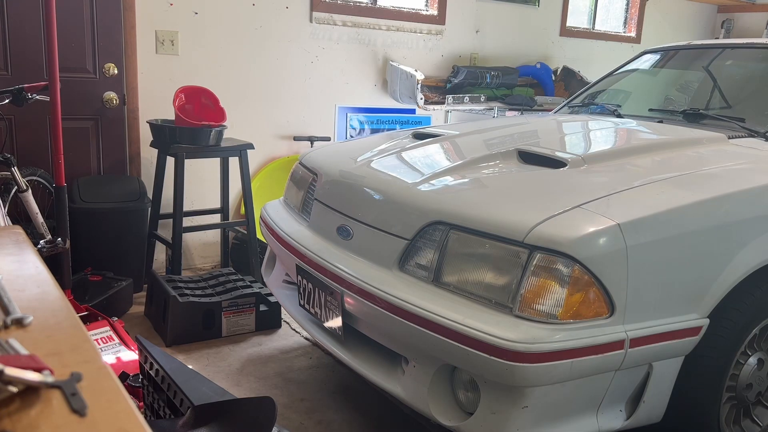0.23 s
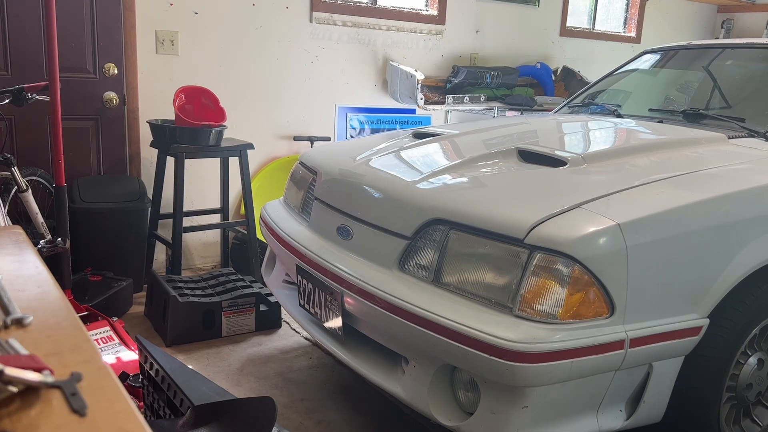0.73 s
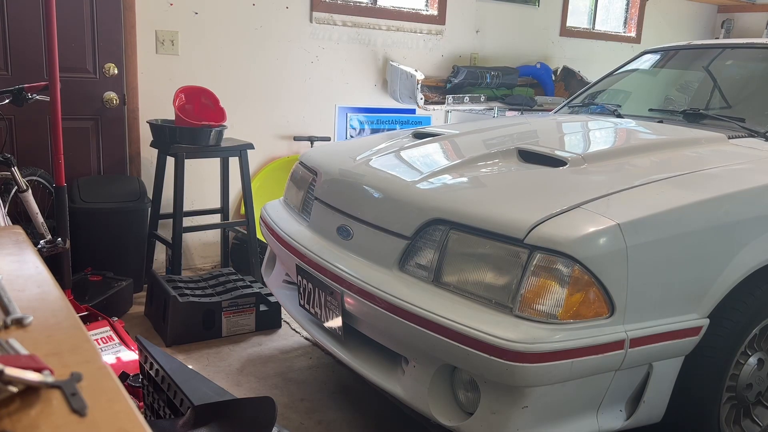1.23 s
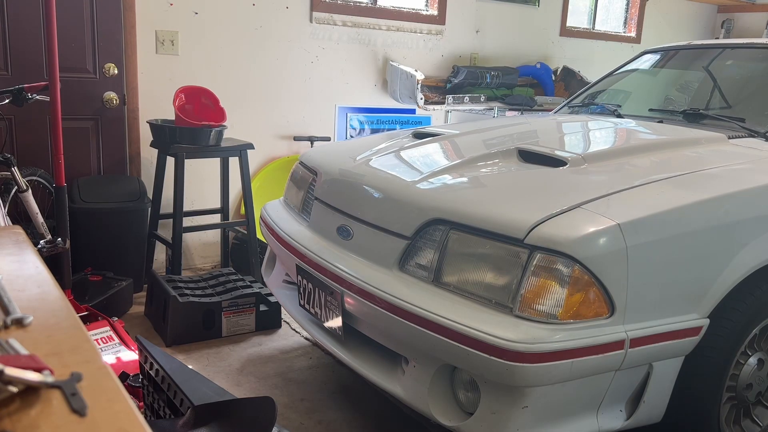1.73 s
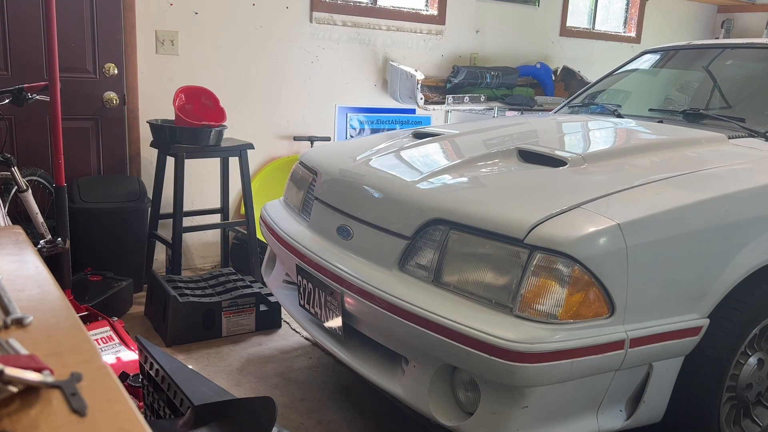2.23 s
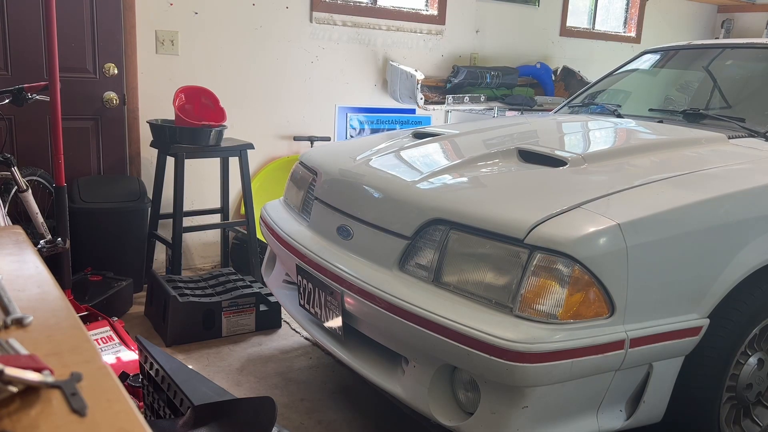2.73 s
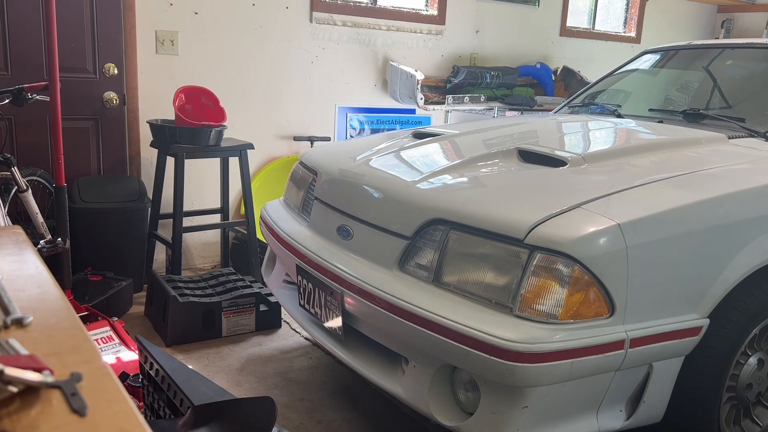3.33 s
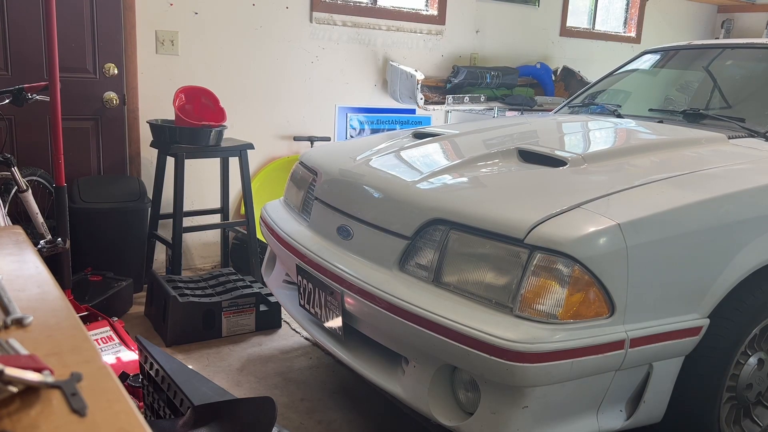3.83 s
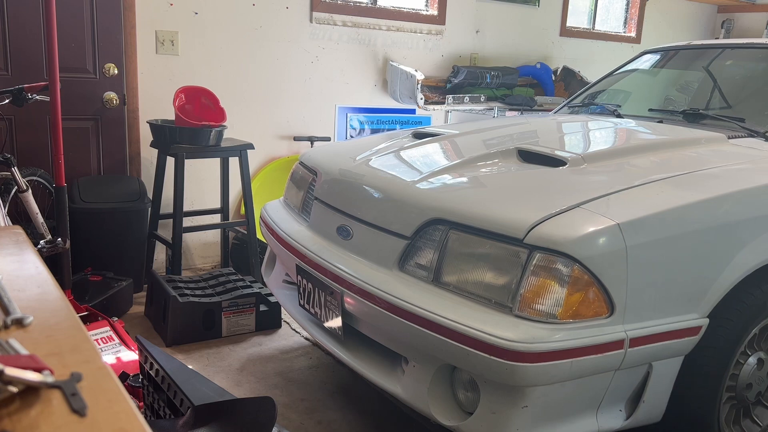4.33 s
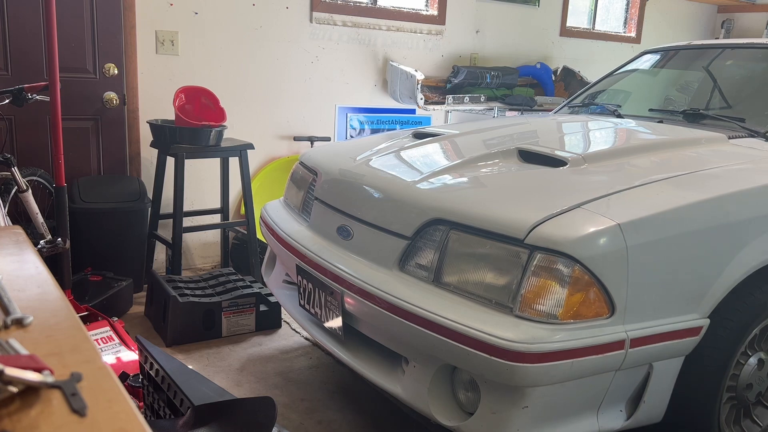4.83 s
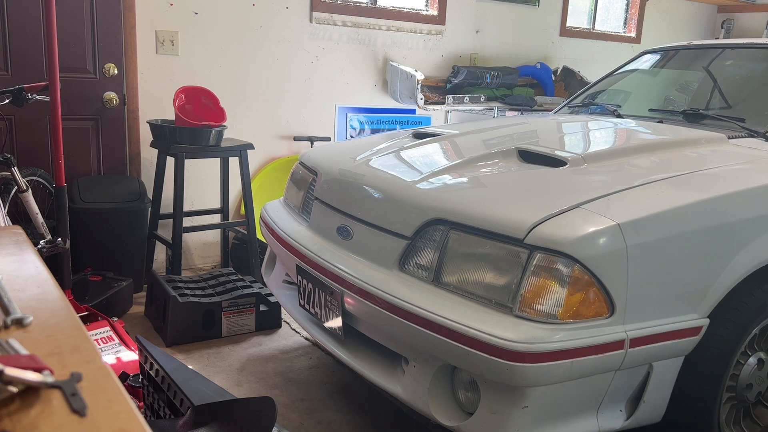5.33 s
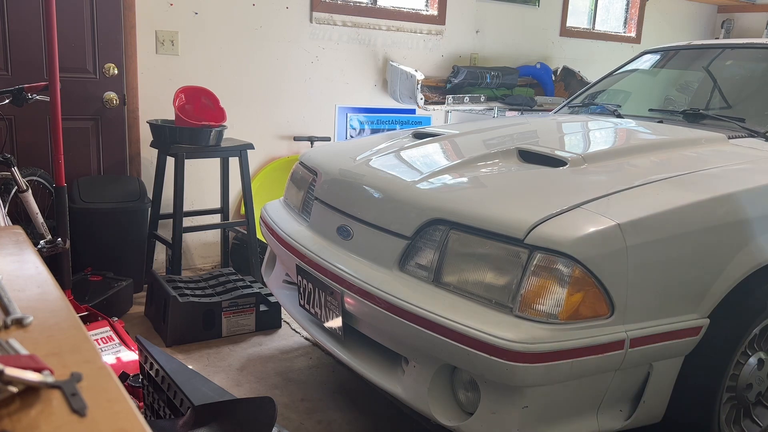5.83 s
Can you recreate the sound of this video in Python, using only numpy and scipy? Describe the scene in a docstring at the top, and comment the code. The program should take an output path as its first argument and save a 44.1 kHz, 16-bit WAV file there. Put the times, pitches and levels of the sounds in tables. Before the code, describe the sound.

Sharp door slam, quiet scuffs and small knocks over a faint low hum, then a weighty car door thump booming through a bare garage.

```python
"""Two door slams in a garage

In a closed home garage a door slams, someone steps and shuffles about, then a heavy car door slams and its cabin booms.
Doors and steps are short noise bursts, with decaying sine tones for the door panels and a held deep tone for the boom.
Shuffling is coloured noise that swells and dies; an appliance hums, faint whines come and go, and the building rumbles.
Bare walls give every knock a tail of about half a second, made of fading noise; two close microphone ports listen."""
import sys
import numpy as np
from scipy import signal
from scipy.fft import rfft, irfft, next_fast_len
from scipy.io import wavfile
from scipy.ndimage import map_coordinates

SR = 44100
rng = np.random.default_rng(int(sys.argv[2]) if len(sys.argv) > 2 else 0)


def store_wav(level_fs):
    """Save 16-bit WAV to argv[1]."""
    pcm = np.round(np.clip(np.atleast_2d(level_fs), -1, 1) * 32767)
    wavfile.write(sys.argv[1], SR, pcm.T.astype(np.int16))


def volts(x):
    """Linear amplitude factor 10**(x/20) for a level x in dB, scalar or array-like."""
    e = np.asarray(x, float) / 20
    return 10 ** e


N = 267598  # samples, about 6 seconds

# Contacts of the first door. Each row: start in seconds, then latch crack, body thump and panel ring,
# each in dB before the room.
FIRST_CONTACTS = [(.4945, -29, -44, -39.5), (.497, -9, -30, -25), (.502, -13, -13, -8),
                  (.511, -23.5, -12, -8), (.530, -25, -17.5, -19.5), (.544, -31.5, -18.5, -19.5)]
# Colour of its latch crack. Each row: pitch in Hz, relative strength in dB per Hz.
FIRST_CRACK_COLOUR = [(200, -10.5), (600, 2.5), (1200, 3), (1700, -6.5), (2400, -7), (3000, -9.5),
                      (3800, -6.5), (4800, -12.5), (7500, -13.5), (11500, -15.5), (14500, -21),
                      (16500, -44.5)]
# Tones its panel rings at. Each row: pitch in Hz, relative level in dB, time to fall 60 dB in seconds.
FIRST_PANEL_MODES = [(122, 0.5, 0.05), (175.7, 1.5, 0.13), (222, -8, 0.062), (258, -6.5, 0.061),
                     (323, -2.5, 0.052), (382, -0.5, 0.079), (442, 5.5, 0.053), (486, 1, .07),
                     (663, -9.5, .05), (825, -10.5, 0.081)]


def first_door():
    """The first door slams: its contacts follow each other within a few hundredths of a second."""
    return door(FIRST_CONTACTS, FIRST_CRACK_COLOUR, FIRST_PANEL_MODES, attack=0.0032, wet_db=4.0)


# Contacts of the car door: seal, latch, then frame. Each row: start in seconds, then latch crack,
# body thump and panel ring, each in dB before the room.
CAR_CONTACTS = [(3.874, -62, -44, -45), (3.8875, -24, -34.5, -30), (3.892, -17.5, -31, -36),
                (3.897, -17.5, -26, -42), (3.903, -11, -19, -17), (3.912, -11.5, -21, -13.5),
                (3.930, -21, -14, -14), (3.940, -18.5, -11, -16.5)]
# Colour of its latch crack. Each row: pitch in Hz, relative strength in dB per Hz.
CAR_CRACK_COLOUR = [(200, -13), (600, 2), (1200, 0), (2000, -7.5), (3500, -11.5), (5000, -13.5),
                    (7000, -12.5), (12000, -16), (15300, -18), (16500, -39)]
# Tones its panel rings at. Each row: pitch in Hz, relative level in dB, time to fall 60 dB in seconds.
CAR_PANEL_MODES = [(123.7, 1, 0.07), (167.1, 4, 0.17), (219, -5, 0.097), (364, -9, 0.11),
                   (545.4, -7, 0.056), (987, 10, 0.02), (1383, -6.5, 0.15)]


def car_door():
    """The heavy car door slams: the seal touches, the latch catches and the frame thumps."""
    return door(CAR_CONTACTS, CAR_CRACK_COLOUR, CAR_PANEL_MODES, attack=0.0015, wet_db=5.5)


# Colour of a sheet metal body being hit. Each row: pitch in Hz, relative strength in dB per Hz.
THUMP_COLOUR = [(40, -17), (80, -1), (170, -5), (450, -5), (900, -7.5), (1600, -32), (4000, -58.5)]


def door(contacts, crack_colour, panel_modes, attack, wet_db):
    """Each contact cracks, thumps the body and rings the panel tones at new random strengths."""
    out = np.zeros((2, N))
    t = np.arange(SR // 2) / SR
    for start, crack_db, thump_db, ring_db in contacts:
        ring = np.zeros(len(t))
        for hz, db, t60 in panel_modes:
            level_db = ring_db + db + rng.normal(0, 3.7)
            ring += volts(level_db - 60 * t / t60) * np.sin(2 * np.pi * hz * t)
        ring *= 1 - np.exp(-t / attack)
        parts = [(crack_colour, crack_db), (THUMP_COLOUR, thump_db)]
        add(out, burst(parts, life=0.0039, direct_db=1.5, wet_db=wet_db), start)
        add(out, garage(ring, ring, direct_db=-2, wet_db=-5.5, rise=0.0027), start)
    return out


def boom():
    """The cabin air is squeezed, holds one deep note and lets go; two close deep tones ring on and beat."""
    seal_closes_s, rise_s, hold_s = 3.8959, .06, .087
    note_hz, held_db = 53.4, -9.7
    sharp_hz, settle_s = 10, .025  # the note starts this much too high and settles
    drop_db, drop_s, fall_db_per_s = 3, .035, 152  # the pressure lets go, then the note dies
    ring_hz, ring_db, ring_t60_s = (50.4, 57.86), -31, 2
    t = np.clip(np.arange(N) / SR - seal_closes_s, 0, None)
    rise = np.sin(np.pi / 2 * np.clip(t / rise_s, 0, 1)) ** 2
    released = np.clip(t - rise_s - hold_s, 0, None)  # seconds since the hold ended
    fall_db = drop_db * np.clip(released / drop_s, 0, 1) + fall_db_per_s * released
    turns = note_hz * t + sharp_hz * settle_s * (1 - np.exp(-t / settle_s))
    waver = .1 * wobble(25)  # radians
    tone = volts(held_db - fall_db) * np.sin(2 * np.pi * turns + waver)
    ring = volts(ring_db - 60 * t / ring_t60_s) * sum(np.sin(2 * np.pi * hz * t) for hz in ring_hz)
    # only in the first view, the one left and right share
    return np.sqrt(2) * rise * np.array([tone + ring, 0 * tone])


# Steps and knocks. Each row: start in seconds, knock in dB, knock pitch in Hz, thud in dB, snap in dB,
# all levels before the room.
STEP_HITS = [(0.009, -53.5, 960, -53.5, -76), (0.14, -51.5, 894, -59, -79),
             (0.346, -59.5, 1364, -67.5, -58.5), (0.823, -37.5, 926, -55.5, -41),
             (0.996, -44.5, 1009, -48, -55.5), (2.119, -50, 941, -58.5, -54),
             (2.782, -53.5, 1210, -79, -60.5), (3.192, -47.5, 1300, -53.5, -71),
             (3.822, -49.5, 1270, -53, -66.5), (4.647, -45, 970, -46.5, -68),
             (5.075, -51.5, 854, -44.5, -72), (5.243, -49.5, 970, -44.5, -56),
             (5.787, -44.5, 588, -40.5, -50)]
# Knocks and ticks, some bright, some dull. Each row: start in seconds, then sizzle, snap, knock and thud,
# each in dB before the room.
KNOCKS_AND_TICKS = [(2.551, -42, -53.5, -73, -60), (3.495, -50.5, -59, -77.5, -74),
                    (4.25, -62, -65, -47.5, -58.5), (4.527, -50.5, -66, -73.5, -74),
                    (5.624, -48.5, -55.5, -54, -49)]
# Colours of the soft thud, the sharp snap and the bright sizzle.
# Each row: pitch in Hz, relative strength in dB per Hz.
THUD_COLOUR = [(100, -6.5), (200, 4), (450, -1.5), (800, -20.5), (2000, -61.5)]
SNAP_COLOUR = [(600, -48.5), (1200, -25), (2200, 5.5), (3300, 6), (4800, -2), (6500, -13.5), (9000, -29.5)]
SIZZLE_COLOUR = [(2000, -57), (4000, -22.5), (5500, -1.5), (9000, -0.5), (12000, -6.5), (16000, -0.5)]


def steps():
    """Steps, then knocks and ticks, some bright, some dull: short noise bursts heard mostly through the room."""
    out = np.zeros((2, N))
    for start, knock_db, hz, thud_db, snap_db in STEP_HITS:
        sizzle_db = snap_db - 6.5
        parts = [(knock(hz), knock_db), (THUD_COLOUR, thud_db),
                 (SNAP_COLOUR, snap_db), (SIZZLE_COLOUR, sizzle_db)]
        add(out, burst(parts, life=0.0013, direct_db=4.0, wet_db=9), start)
    for start, sizzle_db, snap_db, knock_db, thud_db in KNOCKS_AND_TICKS:
        parts = [(SIZZLE_COLOUR, sizzle_db), (SNAP_COLOUR, snap_db),
                 (knock(1440), knock_db), (THUD_COLOUR, thud_db)]
        add(out, burst(parts, life=0.0041, direct_db=-2.5, wet_db=5), start)
    return out


def knock(hz):
    """The colour of a short knock: strongest at one pitch, weaker to both sides."""
    return [(hz * 0.33, -24), (hz * 0.42, -8), (hz, 0), (hz * 1.6, -9), (hz * 2.9, -24), (hz * 6, -60)]


# Moving about all the while. Each row: time in seconds, then tread, scrape and rustle, each in dB
# before the uneven grain.
MOVING_ABOUT = [(0, -65.5, -74.5, -88.5), (1.3, -73.5, -94.5, -89), (2.2, -73, -79.5, -76),
                (2.7, -68, -77.5, -69.5), (3.35, -67.5, -86.5, -78.5), (4.35, -63, -70, -66.5),
                (4.95, -69, -71, -68.5), (6.07, -67.5, -70, -62.5)]
# Single scuffs. Each row: peak time in seconds, swell time in seconds, then scrape and rustle at the peak,
# each in dB before the uneven grain.
SINGLE_SCUFFS = [(.25, 0.062, -72.5, -73.5), (.4, .05, -73.5, -75.5), (1.62, 0.073, -70.5, -70),
                 (1.9, 0.069, -80, -82), (2.42, 0.05, -69, -72), (2.6, 0.075, -61, -59),
                 (2.87, .1, -71, -73.5), (3.0, 0.089, -65.5, -74), (3.56, 0.076, -65.5, -64.5),
                 (3.72, 0.064, -64.5, -72.5), (4.47, .1, -72, -67.5), (5.18, 0.096, -62.5, -62),
                 (5.281, 0.034, -62.5, -69), (5.731, .08, -58, -57.5), (5.931, 0.064, -65, -59),
                 (6.06, 0.069, -63.5, -71.5)]
# Colours of soles on concrete and of clothes. Each row: pitch in Hz, relative strength in dB per Hz.
SCRAPE_COLOUR = [(200, -22), (500, -5.5), (1200, 2), (1600, -0.5), (2200, -8), (3500, -35.5), (7000, -64.5)]
RUSTLE_COLOUR = [(1500, -15.5), (3000, -4), (6000, -8.5), (10000, -7), (16000, -18)]


def shuffle():
    """Soles tread and scrape on concrete and clothes rustle: uneven noise in which each scuff swells and dies."""
    swell_db, fall_db_per_s = 8.5, 90
    t = np.arange(N) / SR
    times, *levels = np.transpose(MOVING_ABOUT)
    tread, scrape, rustle = (volts(np.interp(t, times, db)) for db in levels)
    for peak, swell_s, scrape_db, rustle_db in SINGLE_SCUFFS:
        before_db = -swell_db * ((peak - t) / swell_s) ** 2
        after_db = -fall_db_per_s * (t - peak)
        shape_db = np.where(t < peak, before_db, after_db)
        # hypot adds the powers
        scrape = np.hypot(scrape, volts(scrape_db + shape_db))
        rustle = np.hypot(rustle, volts(rustle_db + shape_db))
    treading = tread * volts(4.2 * wobble(27)) * noise(THUD_COLOUR, (2, N))
    scraping = scrape * volts(1.4 * wobble(40)) * noise(SCRAPE_COLOUR, (2, N))
    rustling = rustle * volts(1.7 * wobble(40)) * noise(RUSTLE_COLOUR, (2, N))
    return treading + scraping + rustling


# Faint fuzzy whines. Each row: start in seconds, end in seconds, pitch in Hz, level in dB before it wavers.
FUZZY_WHINES = [(2.65, 3.85, 2570, -84), (3.2, 3.8, 2790, -84)]


def whine():
    """Faint broken whines that come and go: tones whose level and phase waver quickly."""
    fade_s = 0.082
    t = np.arange(N) / SR
    tone = np.zeros(N)
    for start, end, hz, db in FUZZY_WHINES:
        fade = np.clip(np.minimum(t - start, end - t) / fade_s, 0, 1)
        level = np.sqrt(2) * volts(db + 3 * wobble(25))
        tone += fade * level * np.sin(2 * np.pi * hz * t + 1.5 * wobble(160))
    return np.array([tone, 0.278 * tone])


# Steady tones. Each row: pitch in Hz, average level in dB, phase wavers per second.
HUM_TONES = [(120.1, -53, 4.1), (7060, -95, 200)]


def hum():
    """A mains hum and a thin whine: steady tones with slightly unsteady level and phase."""
    t = np.arange(N) / SR
    tones = np.zeros(N)
    for hz, db, waver_rate in HUM_TONES:
        level = np.sqrt(2) * volts(db + 0.65 * wobble(2.2))
        tones += level * np.sin(2 * np.pi * hz * t + .5 * wobble(waver_rate))
    return np.array([tones, 0.21 * tones])


# Colour of the background. Each row: pitch in Hz, relative strength in dB per Hz.
RUMBLE_COLOUR = [(20, -26), (40, -14.5), (57, 4.5), (75, -8.5), (100, -4), (140, -12.5), (200, -20),
                 (300, -25.5), (500, -37), (1000, -39), (2500, -43.5), (5000, -64), (8000, -51.5),
                 (16500, -58)]


def rumble():
    """The low rumble of the building: coloured noise that slowly wavers in level."""
    return volts(-54.5 + 0.65 * wobble(2.4)) * noise(RUMBLE_COLOUR, (2, N))


# How long the walls ring. Each row: pitch in Hz, time to fall 60 dB in seconds.
WALL_DECAY = [(60, .6), (250, 0.47), (1000, 0.53), (4000, 0.52), (8000, 0.55), (14000, 0.29)]


def garage(direct, source, direct_db, wet_db, rise):
    """Direct sound plus two unrelated wall tails: near walls answer first, the rest dies band by band."""
    hz, t, grains = signal.stft(rng.standard_normal((2, 2 * SR // 3)), SR, nperseg=256)
    decay = volts(-60 * t / along(WALL_DECAY, hz)[:, None])
    tail = signal.istft(grains * decay, SR, nperseg=256)[1]
    t = np.arange(tail.shape[1]) / SR
    tail = tail * (1 - np.exp(-t / rise)) * (1 + 0.65 * np.exp(-t / 0.02))
    tail = volts(wet_db) * tail / np.linalg.norm(tail[0])
    out = signal.fftconvolve(source[None], tail, axes=1)
    out[0, :len(direct)] += volts(direct_db) * direct
    return out


def burst(parts, life, direct_db, wet_db):
    """A short noisy contact mixed from (colour, dB) parts, fading over life seconds, heard in the garage."""
    t = np.arange(SR // 8) / SR
    fade = np.exp(-t / life)
    direct = fade * sum(volts(db) * noise(colour, len(t)) for colour, db in parts)
    # a clean pulse of like energy drives the wall tails
    pulse = np.linalg.norm(fade) * sum(volts(db) * click(colour) for colour, db in parts)
    return garage(direct, pulse, direct_db, wet_db, rise=0.003)


def click(colour):
    """A pulse of energy 1 with this colour, its energy as early as possible (minimum phase)."""
    log_gain = along(colour, np.fft.rfftfreq(4096, 1 / SR)) * np.log(10) / 20
    # folding the cepstrum forward in time makes the phase minimal
    cepstrum = irfft(log_gain) * np.r_[1, np.full(2047, 2), 1, np.zeros(2047)]
    pulse = irfft(np.exp(rfft(cepstrum)))
    return pulse / np.linalg.norm(pulse)


def noise(colour, shape):
    """Coloured noise of rms 1, cut off an octave below the first point of its colour."""
    def gain(hz):
        return volts(along(colour, hz) - 110 * (hz < colour[0][0] / 2))
    return unit(filtered(rng.standard_normal(shape), gain))


def unit(x):
    """Scales a sound to rms 1."""
    return x / np.sqrt(np.mean(x ** 2) + 1e-20)


def along(points, hz):
    """Reads a curve of (Hz, value) points on a log pitch axis."""
    f, v = np.transpose(points)
    return np.interp(np.log(hz + 1), np.log(f + 1), v)


def wobble(rate):
    """A smooth random curve with rate knots a second."""
    knots = rng.standard_normal(int(N * rate / SR) + 4)
    return map_coordinates(knots, [np.arange(N) * rate / SR])


def filtered(x, response):
    """Multiplies the spectrum of x by a complex response of frequency."""
    size = next_fast_len(x.shape[-1] + 8192)
    spectrum = rfft(x, size) * response(np.fft.rfftfreq(size, 1 / SR))
    return irfft(spectrum, size)[..., :x.shape[-1]]


def add(track, sound, start):
    """Mixes a sound into the track at a start time in seconds."""
    part = track[:, round(start * SR):][:, :sound.shape[1]]
    part += sound[:, :part.shape[1]]


def scene():
    """All sources together, as two views of the sound field."""
    return first_door() + car_door() + boom() + steps() + shuffle() + whine() + hum() + rumble()


def band_limit(x):
    """A steep low-pass at the top of the band."""
    return signal.sosfilt(signal.butter(12, 16710, fs=SR, output="sos"), x)


# Likeness of left and right in the finished stereo. Each row: pitch in Hz, likeness from 0 (unrelated)
# to 1 (the same).
STEREO_LIKENESS = [(60, 0.61), (130, 0.76), (290, 0.93), (640, 0.22), (1400, 0.34), (3100, 0.43),
                   (4500, 0.2), (5800, 0.17), (7200, 1), (8700, 0.52), (9300, 0.85), (10900, 0.97),
                   (11300, 0.18), (12250, .4), (12500, 0.89), (14300, .998), (14700, 0.45), (16000, .8)]
# Phase of left and right in the finished stereo. Each row: pitch in Hz, how far left lags right in radians.
STEREO_LAG = [(60, 0), (400, 0.74), (1500, 1.5), (3300, -0.9), (5200, -1.5), (7200, -8.5), (8700, 4),
              (9300, np.pi), (10900, np.pi), (12500, 2 * np.pi), (14300, 2 * np.pi), (15500, 3 * np.pi)]
# Balance of left and right. Each row: pitch in Hz, left over right in dB.
STEREO_BALANCE = [(60, 1.55), (130, 5), (290, 2), (640, 0.5), (1400, 2), (3100, 2.5), (5500, 7), (7200, 3),
                  (9300, -1.5), (15000, -1)]


def record(dry):
    """Left and right share part of the field, with a lag and a balance that change with pitch."""
    def share(hz):
        angle = np.arccos(np.clip(along(STEREO_LIKENESS, hz), -1, 1)) / 2
        return np.array([np.cos(angle), np.sin(angle)])

    def side_response(hz):
        lag = np.interp(hz, *np.transpose(STEREO_LAG))
        skew = volts(along(STEREO_BALANCE, hz) / 2) * np.exp(-.5j * lag)
        top_cut = volts(-25 * (hz > 15900))  # little is kept above this pitch
        return np.array([skew, 1 / skew]) * top_cut

    shared, own = filtered(dry, share)
    stereo = filtered(np.array([shared + own, shared - own]), side_response)
    stereo = stereo / (1 + np.abs(stereo / .88) ** 6) ** (1 / 6)  # the input stage saturates softly
    return band_limit(stereo)


dry = scene()
out = record(dry)
store_wav(out)
```